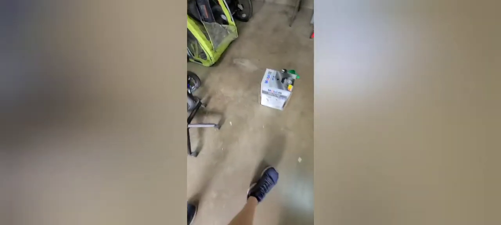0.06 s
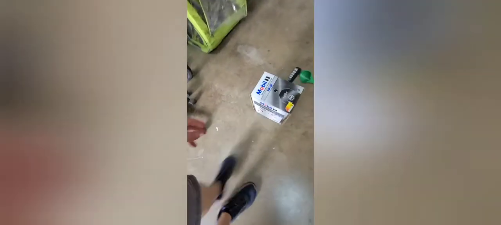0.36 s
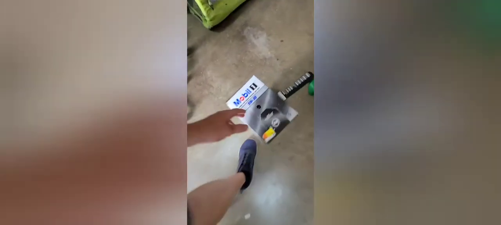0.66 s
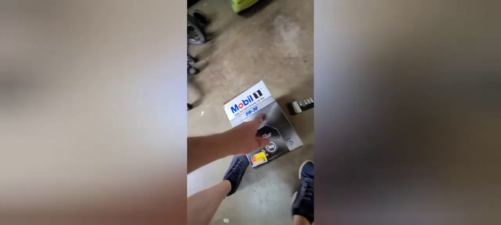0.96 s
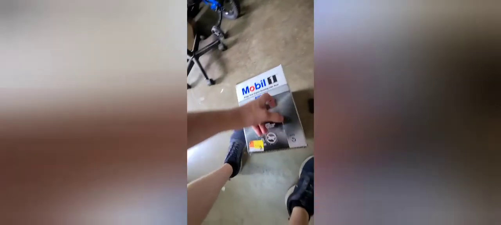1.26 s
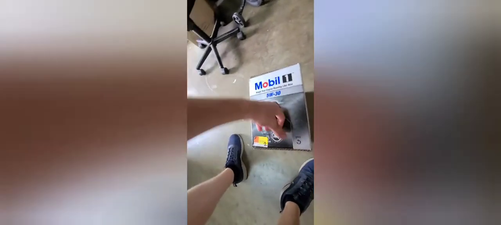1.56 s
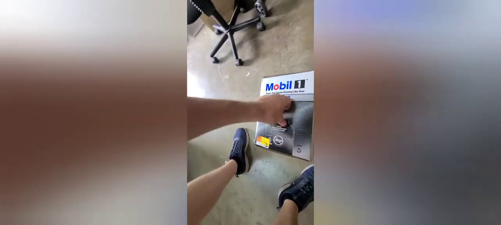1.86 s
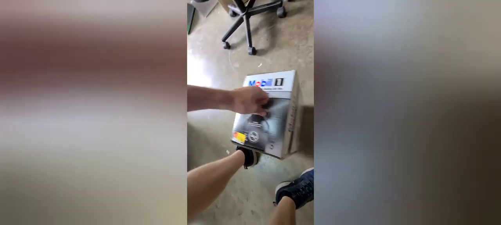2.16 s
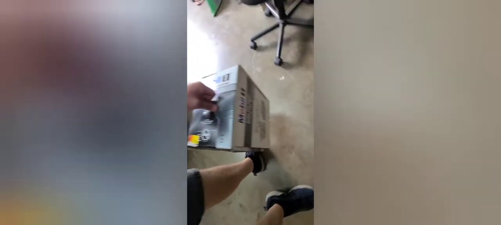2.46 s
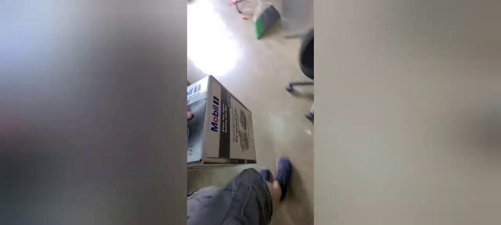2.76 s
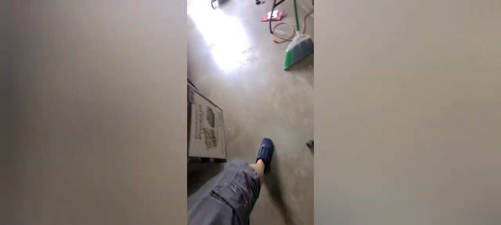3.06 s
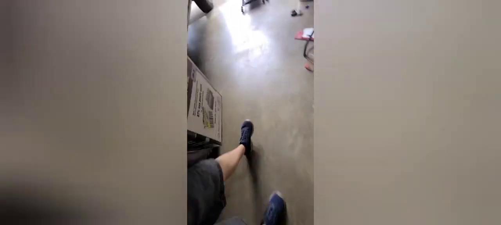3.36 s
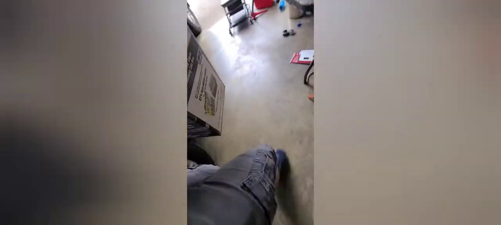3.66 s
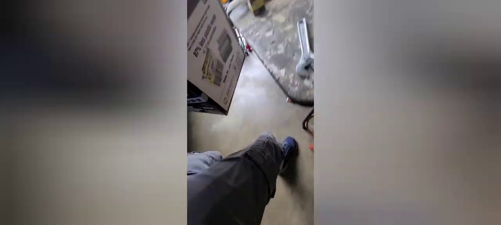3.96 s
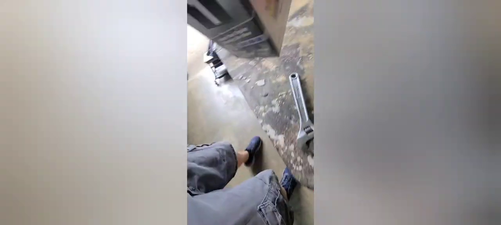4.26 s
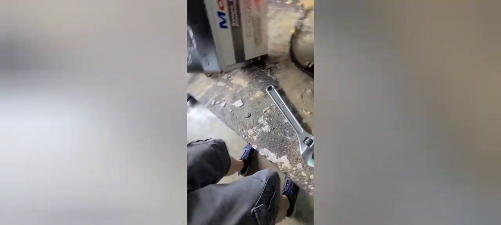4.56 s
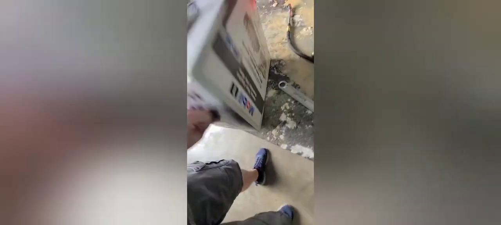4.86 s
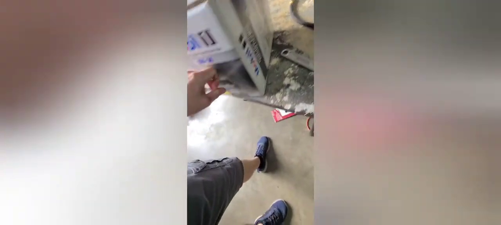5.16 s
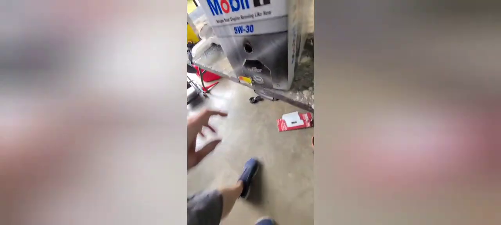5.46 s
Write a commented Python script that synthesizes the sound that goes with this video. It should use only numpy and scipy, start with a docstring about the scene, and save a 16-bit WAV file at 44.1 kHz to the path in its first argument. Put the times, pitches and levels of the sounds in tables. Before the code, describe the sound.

A heavy cardboard box is gripped with knocks and rustles, carried, then thudded and shoved onto a workbench in a garage.

```python
"""A heavy cardboard box is moved in a garage, close to a hand-held microphone. First, cardboard
crackles, clothes rustle, and fingers knock and slip on the ringing panels; a thin tinkle sounds.
A sole squeaks on concrete. Air buffets the microphone during the carry, and a sharp snap excites the
room. Last, the box thuds onto a workbench and is shoved twice: the bench judders, the base rasps
over grit, a jogged steel tool clinks and the tinkle returns."""
import sys
import numpy as np
from scipy import signal
from scipy.fft import rfft, irfft
from scipy.io import wavfile
from scipy.ndimage import uniform_filter1d

SR = 44100
rng = np.random.default_rng(int(sys.argv[2]) if len(sys.argv) > 2 else 0)


def waveform_to_disk(signal):
    """Save audio, clipped to [-1, 1], as 16-bit WAV at the path in sys.argv[1]."""
    frames = np.transpose(np.atleast_2d(signal))
    scaled = np.clip(frames, -1, 1) * 32767
    samples = np.round(scaled).astype(np.int16)
    wavfile.write(sys.argv[1], SR, samples)


N = 252463
TIME_S = np.arange(N) / SR
AGE_S = np.arange(SR * 6 // 10) / SR

# Stereo width. Each row: frequency in Hz, side minus mid in dB.
WIDTH_SPECTRUM = [(60, -12.5), (180, -20.5), (380, -7.5), (700, -2.5), (1300, 2), (3000, -0.5),
                  (15000, 1.5)]
# Garage reverberation. Each row: frequency in Hz, t60 in seconds.
GARAGE_DECAY = [(100, 0.35), (400, 0.36), (1500, 0.47), (4000, 0.39), (8000, 0.46), (15000, 0.34)]
# Source spectra. Each row: frequency in Hz, relative density in dB.
AIR_SPECTRUM = [(18, -29), (30, -23), (59, -2.5), (86, -0.5), (165, -12), (649, -17.5), (801, -16.5),
                (2170, -27.5), (3140, -29.5), (5170, -35.5), (6900, -31), (9710, -42.5), (12300, -36),
                (16000, -46)]
BUFFET_SPECTRUM = [(15, -8), (30, -9.5), (60, -3.5), (82, 0.5), (120, -18), (250, -34.5), (2000, -86)]
RUSTLE_SPECTRUM = [(710, -33), (1200, -1.5), (2300, -5.5), (2830, -2.5), (4500, -3.5), (9010, -6.5),
                   (16000, -15)]
SNAP_SPECTRUM = [(88, -57), (150, -22), (270, 4.5), (303, -11), (334, 4.5), (383, -3.5), (545, -9.5),
                 (960, -13), (1060, -18), (1310, -13.5), (2650, -9.5), (3700, -6), (16000, -28)]
JUDDER_SPECTRUM = [(21, -46), (35, -15), (59, -12), (113, 1), (142, -3.5), (260, -4), (296, 3), (342, -6),
                   (450, -7), (505, -11), (801, -14), (952, -33.5), (1100, -19), (1430, -46), (2420, -120)]
SCRAPE_SPECTRUM = [(500, -32), (850, 2), (925, -8), (1070, 1.5), (2070, -7), (3060, -19), (3600, -29),
                   (4680, -56), (7920, -120)]
GRIT_SPECTRUM = [(1650, -22), (2800, 0), (4370, -6), (5130, -5.5), (11000, -11.5), (12200, -8.5),
                 (16000, -18)]
# Microphone jolts. Each row: start in seconds, level in dB.
MIC_JOLTS = [(1.15, -45.5), (2.45, -27.5), (3.31, -46)]
# Cardboard and grit crackles. Each row: start in seconds, level in dB.
CRACKLES = [(0.04, -33), (0.186, -36.5), (0.425, -49), (0.519, -47), (0.8626, -30), (1.0738, -31),
            (1.1454, -22.5), (1.2435, -23), (1.472, -25.5), (1.638, -32), (1.8086, -33), (2.913, -29.5),
            (3.03, -26), (3.2889, -34)]
# Clothes and hands brushing the box. Each row: start in seconds, rise in seconds, level in dB.
BRUSH_STROKES = [(0.10, 0.043, -55), (0.46, 0.066, -57), (0.865, 0.085, -52), (1.064, 0.01, -41.5),
                 (1.138, 0.0081, -43), (1.228, 0.0052, -49), (1.342, 0.081, -47), (1.60, 0.064, -46.5),
                 (2.27, 0.092, -49.5), (2.83, 0.11, -54.5), (3.33, 0.043, -54), (3.726, 0.01, -46.5),
                 (4.319, .016, -52), (5.271, 0.0027, -37), (5.484, 0.096, -37)]
# Blows on the box. Each row: start in seconds, level in dB, favoured pitch in Hz, roll-off in dB/octave.
PANEL_KNOCKS = [(0.141, -26.5, 620, 7), (0.865, -36.5, 530, 32), (0.928, -27, 480, 3), (1.074, -10, 500, 5),
                (1.085, -10.5, 520, 3.5), (1.147, -13, 480, 1), (1.231, -12, 810, 10),
                (1.243, -8, 378, 7.5), (1.249, -17.5, 295, 12), (1.472, -6.5, 285, 9),
                (1.683, -28, 1000, 6.5), (1.877, -17, 475, 18), (3.614, -17.5, 322, 37),
                (3.820, 2.5, 370, 1), (4.113, -36, 250, 25), (4.317, -28, 700, 0)]
# Panel, bench and tool modes. Each row: frequency in Hz, level in dB, base t60 in seconds.
PANEL_MODES = [(192, -16, 0.031), (252.7, -7.5, 0.054), (346, 0, 0.032), (427, -1.5, 0.032),
               (516.4, -6, 0.047), (1008, -6, 0.023), (1220, -6.5, 0.024), (1715, -6, 0.018),
               (2160, -11, 0.014), (3000, 2, 0.006)]
BENCH_MODES = [(96.8, -11, 0.47), (138.4, -2, 0.73), (163, -0.5, 0.24), (190.7, 0, 0.37),
               (250.4, -2.5, 0.32), (299.8, 4.5, 0.24), (393, -1, 0.18), (432, 2.5, 0.082),
               (542, -2.5, 0.14), (584, -9, 0.18), (688, -3.5, 0.1), (809, -11.5, 0.091),
               (1110, -16, 0.023)]
TOOL_MODES = [(3300, -10, 0.08), (5020, -4, 0.05), (5390, 3, 0.04), (6360, 0, 0.036), (7000, -2, .035),
              (10170, -14, .06), (11900, -3, 0.03), (12306, -21, .42)]
# High tinkles. Each row: start in seconds, level in dB.
HIGH_TINKLES = [(0.187, -37), (0.425, -47), (4.665, -37), (5.08, -45)]
# Finger drags. Each row: start in seconds, level in dB.
FINGER_RUBS = [(0.876, -35), (1.053, -30.5), (1.385, -36.5)]
# Sole twists. Each row: crest in seconds, pitch in Hz, level in dB, rise and fade constant in seconds.
SOLE_SQUEAKS = [(1.843, 1261, -41, 0.032), (1.997, 1304, -44.5, 0.017)]
# Box landing and rocking. Each row: start in seconds, level in dB, pitch in Hz, t60 in seconds.
LANDING_THUDS = [(4.45, -4.5, 63.8, 0.21), (4.489, -9, 146, 0.15), (4.626, -10.5, 66, 0.14),
                 (4.891, -8.5, 91, 0.13), (4.941, -13, 63.5, 0.5)]
# Edges striking the bench top. Each row: start in seconds, level in dB.
EDGE_BUMPS = [(4.459, -13.5), (4.491, -9.5), (4.894, -5)]
# Pushes. Each row: start in seconds, rise in seconds, swell in dB, end in seconds, level in dB.
BOX_SHOVES = [(4.457, 0.044, 10, 4.78, -12), (4.89, 0.06, 2.5, 5.076, -15)]
# Tool strikes. Each row: start in seconds, level in dB.
TOOL_CLINKS = [(4.515, -14), (4.521, -9), (4.608, -27), (4.953, -19), (5.030, -28)]


def from_db(db):
    """Decibels to gain."""
    return 10 ** (np.asarray(db) / 20)


def unit_rms(x):
    """Scale to unit power."""
    return x / np.sqrt(np.mean(x ** 2) + 1e-20)


def unit_peak(x):
    """Scale to unit peak."""
    return x / np.max(np.abs(x))


def at_hz(points, hz):
    """Interpolate a table over log frequency."""
    points_hz, values = np.array(points).T
    return np.interp(np.log(hz + 1e-3), np.log(points_hz), values)


def butter(x, hz, kind, order=2):
    """Butterworth filter."""
    return signal.sosfilt(signal.butter(order, hz, kind, fs=SR, output="sos"), x)


def convolve(x, response):
    """Apply an impulse response; keep the input length."""
    full = signal.oaconvolve(np.atleast_2d(x), np.atleast_2d(response), axes=1)
    return full[:, :np.shape(x)[-1]].squeeze()


def pulse(spectrum, size=4096):
    """Minimum-phase pulse with this spectrum."""
    bins_hz = np.arange(size // 2 + 1) * SR / size
    cepstrum = irfft(np.log(from_db(at_hz(spectrum, bins_hz))))
    cepstrum[1:size // 2] *= 2
    return irfft(np.exp(rfft(cepstrum[:size // 2], size)))


def add(track, start_s, sound):
    """Mix a sound into a track."""
    start = int(start_s * SR)
    track[start:start + len(sound)] += sound[:N - start]


def drift(rate_hz):
    """Random wander, unit RMS."""
    knots = rng.standard_normal(int(N / SR * rate_hz) + 2)
    return unit_rms(np.interp(TIME_S * rate_hz, np.arange(len(knots)), knots))


def grains(per_s, spread_db):
    """Two streams of random clicks of uneven size."""
    clicks = np.zeros((2, N))
    hit = rng.random((2, N)) < per_s / SR
    draw = rng.uniform(-1, 1, (2, N))[hit]
    clicks[hit] = np.sign(draw) * from_db(spread_db * np.minimum(-np.log(np.abs(draw)), 4))
    return clicks


def stroke(start_s, rise_s, swell_db, fall_db_per_s, onset_s=0.004):
    """Gain of one movement: catch, swell, decay."""
    age_s = TIME_S - start_s
    rising_db = swell_db * np.clip(1 - age_s / rise_s, 0, 1)
    falling_db = fall_db_per_s * np.maximum(age_s - rise_s, 0)
    return np.clip(age_s / onset_s, 0, 1) * from_db(-rising_db - falling_db)


def ring(modes, uneven_db=0):
    """Decaying modes after one blow, with optional level scatter."""
    return sum(from_db(db + uneven_db * rng.normal() - 60 * AGE_S / t60_s)
               * np.sin(2 * np.pi * hz * AGE_S) for hz, db, t60_s in modes)


def left_right(mid, side):
    """Mid and side to stereo: narrow bass, wide treble."""
    return mid + convolve(side, pulse(WIDTH_SPECTRUM)) * [[1], [-1]]


def wide(pair, response):
    """Two independent streams through one body, normalised, as stereo."""
    mid, side = map(unit_rms, convolve(pair, response))
    return left_right(mid, side)


def garage(build_s=0.0033, early_s=0.0082):
    """Room response: strong early reflections, then a tail decaying band by band."""
    noise = left_right(*rng.standard_normal((2, len(AGE_S))))
    edges_hz = np.geomspace(70, 17000, 9)
    tail = np.zeros_like(noise)
    for k, (low_hz, high_hz) in enumerate(zip(edges_hz, edges_hz[1:])):
        t60_s = at_hz(GARAGE_DECAY, np.sqrt(low_hz * high_hz))
        tail += (-1) ** k * butter(noise, [low_hz, high_hz], "band") * from_db(-60 * AGE_S / t60_s)
    envelope = (1 - np.exp(-AGE_S / build_s)) * (1 + np.exp(-AGE_S / early_s))
    return unit_rms(tail * envelope) / np.sqrt(len(AGE_S))


def place(x, room, wet_db, lag_ms, pan_db):
    """Direct sound plus room; positive lag and pan lean left."""
    direct = np.array([x, np.interp(TIME_S - lag_ms / 1000, TIME_S, x)])
    return direct * from_db([[pan_db / 2], [-pan_db / 2]]) + from_db(wet_db) * convolve(x, room)


def garage_air(level_db=-49):
    """Steady, bass-heavy room noise."""
    return from_db(level_db) * wide(rng.standard_normal((2, N)), pulse(AIR_SPECTRUM))


def mic_buffet(walk_from_s=2.14, walk_to_s=4.45, walk_db=-41.5, still_db=-50.5):
    """Eddies rumble on the moving microphone, some shared, some local to each port."""
    shared, *local = convolve(rng.standard_normal((3, N)), pulse(BUFFET_SPECTRUM))
    walking = uniform_filter1d(1.0 * ((TIME_S > walk_from_s) & (TIME_S < walk_to_s)), size=SR // 10)
    jolts = sum(from_db(db) * stroke(start_s, rise_s=0.064, swell_db=16, fall_db_per_s=54)
                for start_s, db in MIC_JOLTS)
    motion = from_db(still_db + (walk_db - still_db) * walking) + jolts
    return motion * unit_rms(shared + from_db(0.5) * np.array(local))


def crackles(room, fade_s=0.0066):
    """Brief clusters of tiny fractures in cardboard and grit."""
    track = np.zeros(N)
    colour, age_s = pulse(RUSTLE_SPECTRUM), AGE_S[:SR // 20]
    for start_s, db in CRACKLES:
        fractures = rng.standard_normal(len(age_s)) ** 3 * np.exp(-age_s / fade_s)
        add(track, start_s, from_db(db) * unit_peak(convolve(fractures, colour)))
    return from_db(2) * place(track, room, wet_db=-7, lag_ms=-0.11, pan_db=1)


def rustle():
    """Clothes and hands brush the box: dense fibre contacts in clumps."""
    effort = sum(from_db(db) * stroke(start_s, rise_s, swell_db=10.5, fall_db_per_s=195)
                 for start_s, rise_s, db in BRUSH_STROKES)
    clumps = from_db(2.4 * drift(rate_hz=110))
    return effort * clumps * wide(grains(per_s=6000, spread_db=1.5), pulse(RUSTLE_SPECTRUM))


def knocks(room, contact_s=0.0017, grip_s=1.2):
    """Each blow favours some panel modes by where it lands; the grip shortens the ring."""
    track = np.zeros(N)
    for start_s, db, favoured_hz, db_per_octave in PANEL_KNOCKS:
        t60_scale = 1.4 if start_s < grip_s else 0.71
        modes = [(hz, mode_db - db_per_octave * abs(np.log2(hz / favoured_hz)), t60_s * t60_scale)
                 for hz, mode_db, t60_s in PANEL_MODES]
        blow = ring(modes, uneven_db=2.5) * (1 - np.exp(-AGE_S / contact_s))
        radiated = butter(blow, 176, "high")   # small panels radiate little bass
        add(track, start_s, from_db(db) * unit_peak(radiated))
    return place(track, room, wet_db=-6.5, lag_ms=0.12, pan_db=0.5)


def tinkles(room, pitch_hz=14970, t60_s=0.051):
    """Something tiny rings at the top of hearing."""
    track = np.zeros(N)
    for start_s, db in HIGH_TINKLES:
        add(track, start_s, ring([(pitch_hz, db, t60_s)]))
    return place(track, room, wet_db=-9, lag_ms=0, pan_db=5)


def finger_rub():
    """Skin sticks and slips on cardboard, ringing the panel."""
    panel = butter(ring(PANEL_MODES), [400, 620], "band")
    pressure = sum(from_db(db) * stroke(start_s, rise_s=0.062, swell_db=18, fall_db_per_s=172)
                   for start_s, db in FINGER_RUBS)
    return pressure * wide(grains(per_s=340, spread_db=0.5), panel)


def sole_squeak(room, glide_hz_per_s=800):
    """Twisting rubber sticks and slips on concrete at an unsteady, rising rate."""
    tone = np.zeros(N)
    jitter = 1 + 0.0333 * drift(rate_hz=500)
    for crest_s, hz, db, fade_s in SOLE_SQUEAKS:
        slip_hz = (hz + glide_hz_per_s * (TIME_S - crest_s)) * jitter
        envelope = from_db(db) * np.exp(-np.abs(TIME_S - crest_s) / fade_s)
        tone += envelope * np.sin(2 * np.pi * np.cumsum(slip_hz) / SR)
    flutter = from_db(3.6 * drift(rate_hz=90))
    return place(tone * flutter, room, wet_db=-3, lag_ms=0.033, pan_db=8.5)


def snap(room, start_s=3.8573):
    """One very short crack excites the whole room."""
    track = np.zeros(N)
    crack = butter(pulse(SNAP_SPECTRUM), [650, 9000], "band", order=1)
    add(track, start_s, from_db(2.5) * unit_peak(crack))
    return place(track, room, wet_db=4.5, lag_ms=-0.039, pan_db=-3)


def landing(room, contact_s=0.0047, crunch_s=0.0014, damping_s=0.069):
    """The weight bounces on the bench frame; the edges strike its top."""
    frame, top = np.zeros((2, N))
    for start_s, db, hz, t60_s in LANDING_THUDS:
        thud = ring([(hz, 0, t60_s)]) * (1 - np.exp(-AGE_S / contact_s))
        add(frame, start_s, -from_db(db) * unit_peak(thud))
    for start_s, db in EDGE_BUMPS:
        burst = rng.standard_normal(len(AGE_S)) * np.exp(-AGE_S / crunch_s)
        crunch = butter(burst, [900, 4200], "band")
        thump = ring(BENCH_MODES, uneven_db=5.5) * np.exp(-AGE_S / damping_s)
        add(top, start_s, from_db(db) * (unit_peak(thump) + from_db(-5) * unit_peak(crunch)))
    return frame * from_db([[0.7], [-0.7]]) + place(top, room, wet_db=-5, lag_ms=0.087, pan_db=2.5)


def shove_envelopes(stop_db_per_s=127, settle_db=-12.5, settle_db_per_s=38):
    """Force sags, drops after the push, then lingers as the load settles; loose grit soon clears."""
    force, loose_grit = np.zeros((2, N))
    for start_s, rise_s, swell_db, end_s, db in BOX_SHOVES:
        coast_s = np.maximum(TIME_S - end_s, 0)
        slowing_db = np.maximum(-stop_db_per_s * coast_s, settle_db - settle_db_per_s * coast_s)
        push = stroke(start_s, rise_s, swell_db, fall_db_per_s=12)
        force = np.maximum(force, from_db(db + slowing_db) * push)
        loose_grit += from_db(db) * stroke(start_s, rise_s, swell_db=13.5, fall_db_per_s=75.5)
    return force, loose_grit


def slide(judder_db=-1.5, ringing_db=-4, scrape_db=-13, grit_db=-18):
    """Uneven slips shake box and bench; the corrugated base rasps over grit."""
    force, loose_grit = shove_envelopes()
    judder = from_db(judder_db) * force * wide(grains(per_s=450, spread_db=1.1), pulse(JUDDER_SPECTRUM))
    slips = force * unit_rms(grains(per_s=250, spread_db=2.5))
    bench = unit_rms(ring(BENCH_MODES)) / np.sqrt(len(AGE_S))
    ringing = from_db(ringing_db) * left_right(*convolve(slips, bench))
    dense_modes = rng.standard_normal(len(AGE_S)) * np.exp(-AGE_S / 0.0051)
    full_box = convolve(dense_modes, pulse(SCRAPE_SPECTRUM))
    contact = force ** 2 / (force + 0.8 * loose_grit + 1e-9)   # grit holds the base off the bench
    scrape = from_db(scrape_db) * contact * wide(grains(per_s=1800, spread_db=2.5), full_box)
    grit = from_db(grit_db) * loose_grit * wide(grains(per_s=7000, spread_db=3.5), pulse(GRIT_SPECTRUM))
    catching = from_db(1.2 * drift(rate_hz=80))
    return ringing + catching * (judder + scrape + grit)


def tool_clinks(room):
    """The jogged steel tool rings briefly."""
    track = np.zeros(N)
    for start_s, db in TOOL_CLINKS:
        add(track, start_s, from_db(db) * unit_peak(ring(TOOL_MODES, uneven_db=4)))
    return from_db(3) * place(track, room, wet_db=-14, lag_ms=-0.03, pan_db=1)


def scene():
    """Grip, carry, set down and shove, in one room."""
    room = garage()
    handling = knocks(room) + finger_rub() + crackles(room) + rustle()
    carrying = snap(room) + sole_squeak(room)
    on_bench = landing(room) + slide() + tool_clinks(room)
    return handling + carrying + on_bench + tinkles(room) + garage_air() + mic_buffet()


def record(dry, cutoff_hz=15900):
    """Clip at full scale, then low-pass steeply."""
    lowpass = signal.ellip(10, 0.1, 90, cutoff_hz, fs=SR, output="sos")
    return signal.sosfilt(lowpass, np.clip(dry, -1, 1))


dry = scene()
out = record(dry)
waveform_to_disk(out)
```